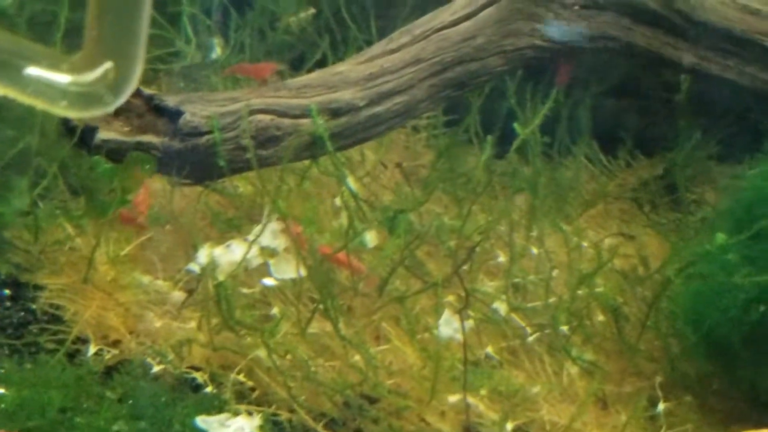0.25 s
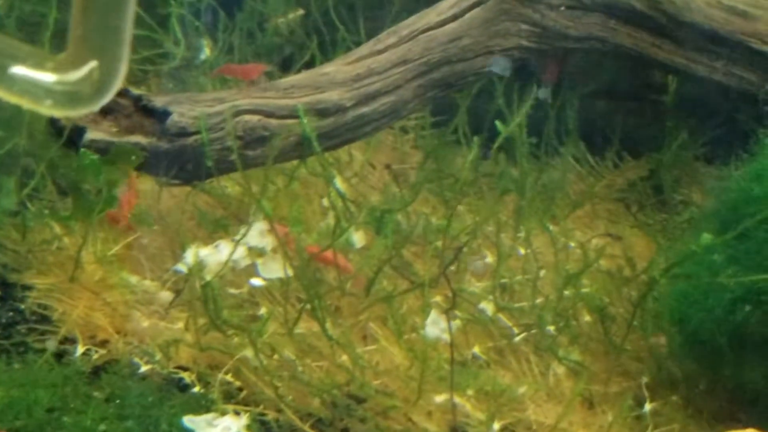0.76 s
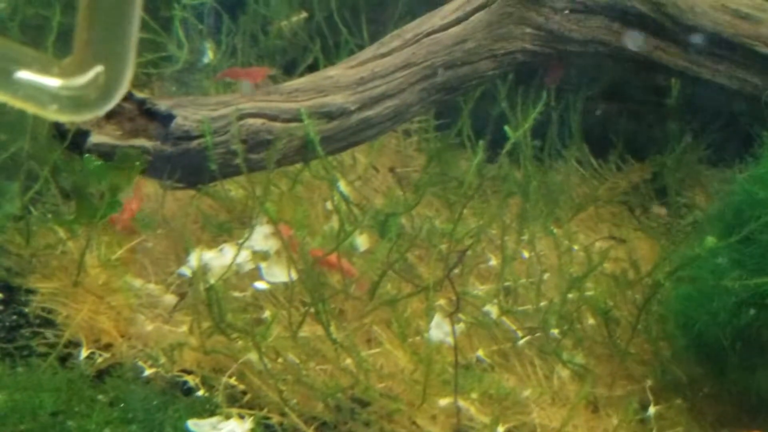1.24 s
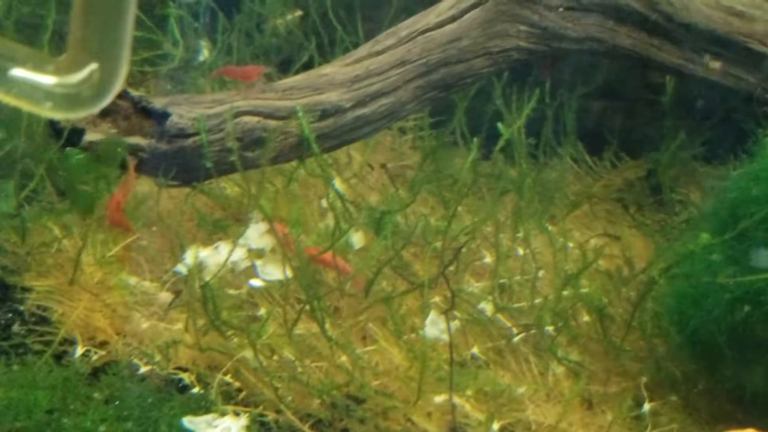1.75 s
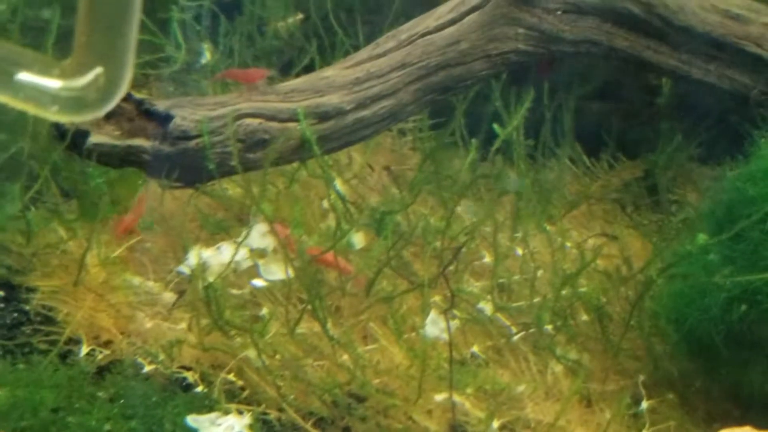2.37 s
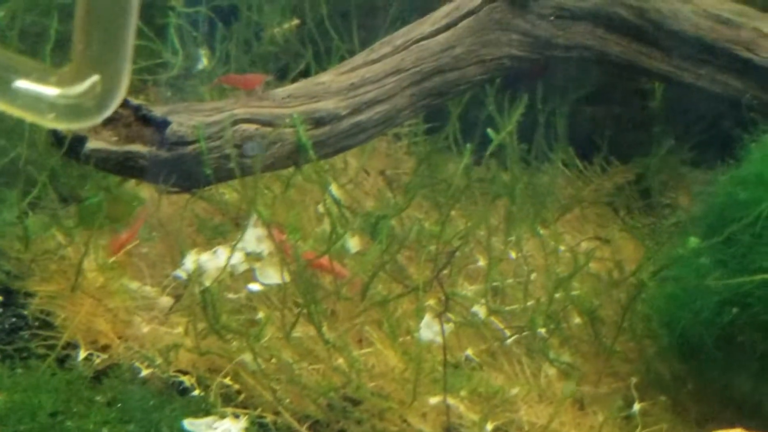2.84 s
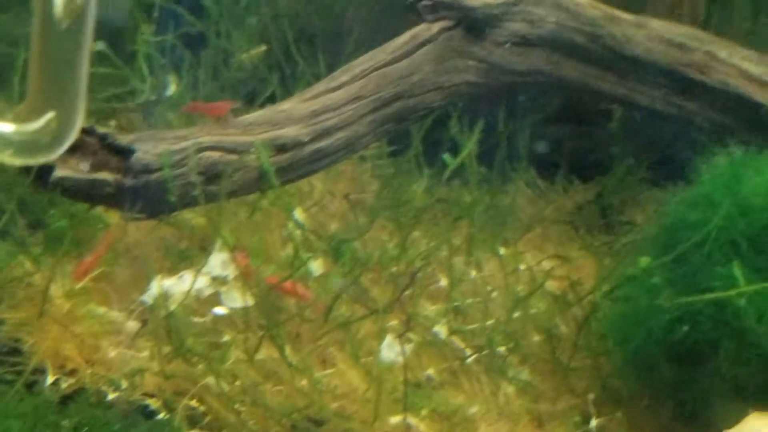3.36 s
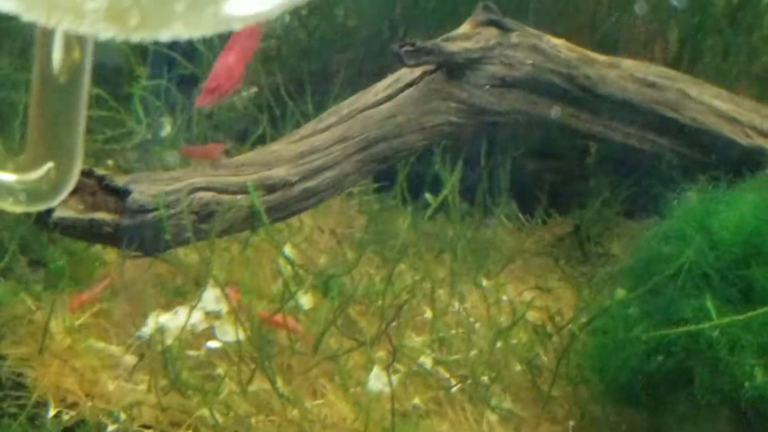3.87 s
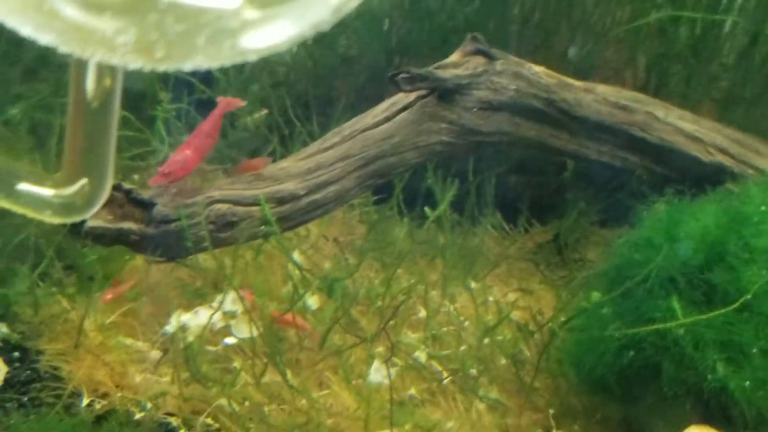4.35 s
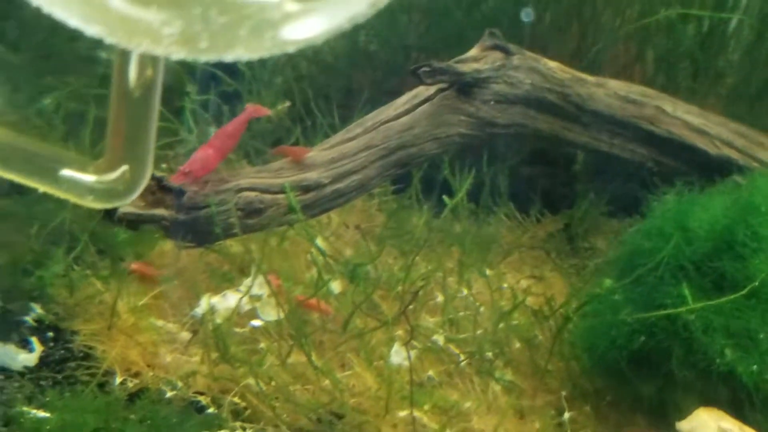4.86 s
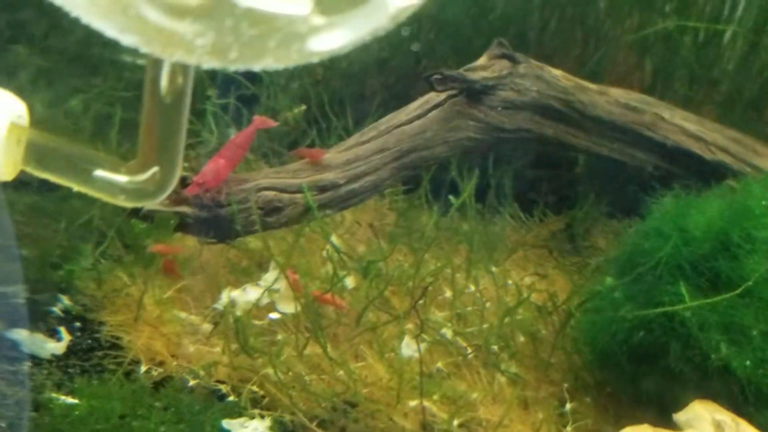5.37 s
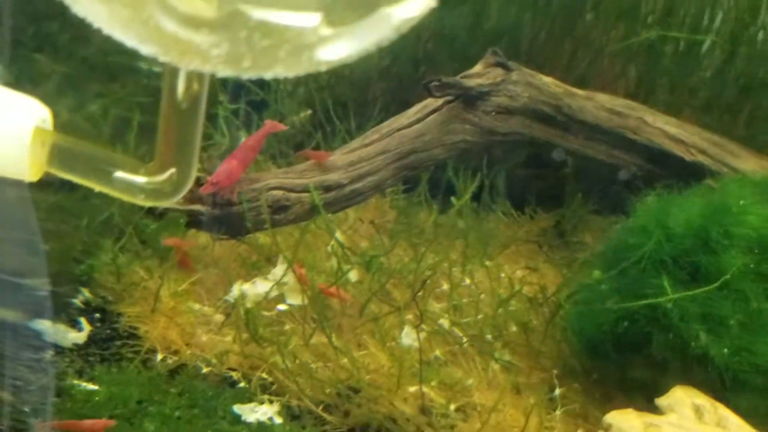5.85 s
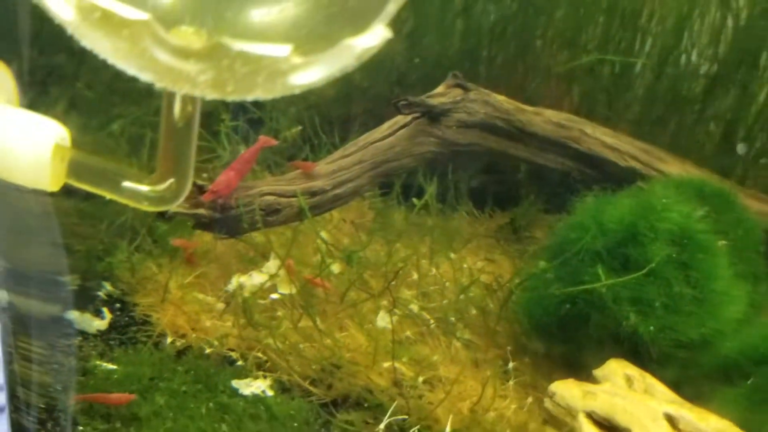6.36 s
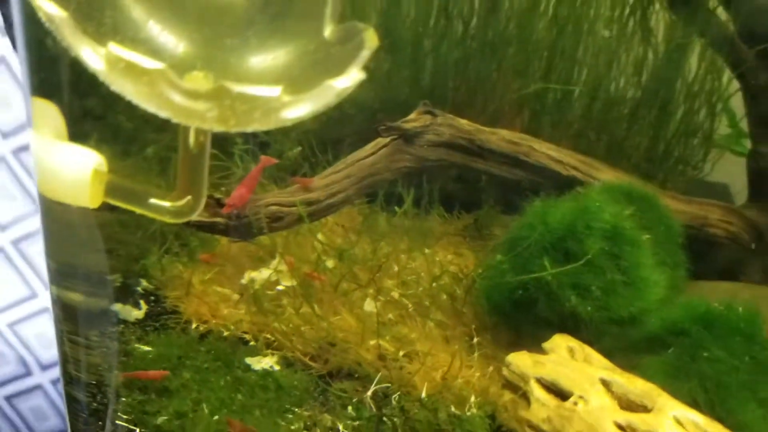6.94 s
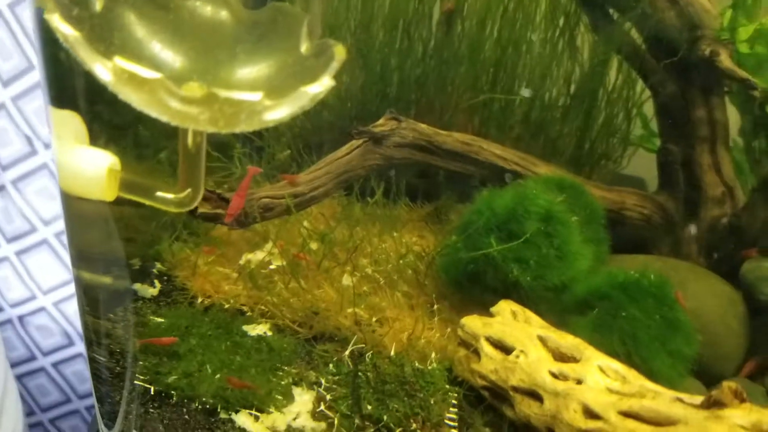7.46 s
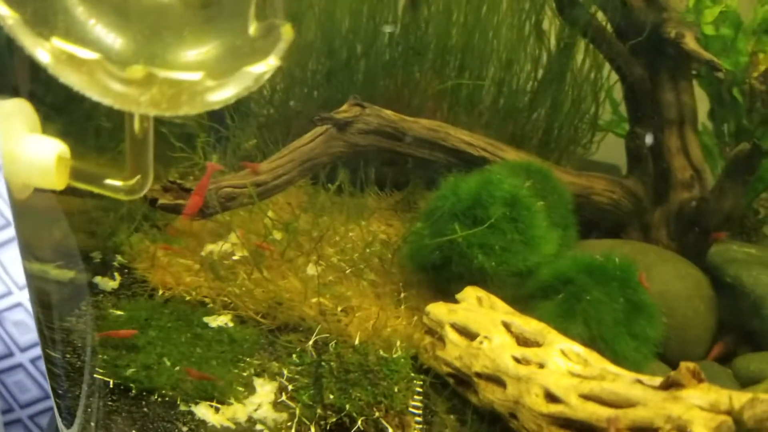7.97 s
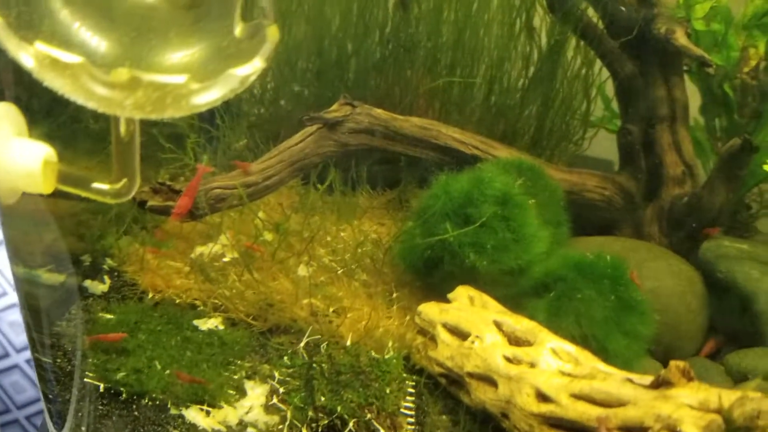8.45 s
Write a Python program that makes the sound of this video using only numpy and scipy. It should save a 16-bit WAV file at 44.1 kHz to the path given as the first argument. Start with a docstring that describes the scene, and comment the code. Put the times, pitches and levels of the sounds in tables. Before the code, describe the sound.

For about eight and a half seconds an aquarium filter pump runs without pause in a quiet room. Its low electric hum, mostly the mains tone and its first few harmonics, wavers very slightly over a soft rumble, with a faint high buzz. Water hisses through the plastic housing with a narrow, ringing colour around three to four kilohertz, stronger and brighter on the right. Tiny bubbles burst irregularly as faint, very high ticks: around 0.9, a cluster from 2.0 to 3.0, a clearer one at 4.5, several between 5.1 and 5.6. The surface fizz rises slightly at 2.2. From 3.2 to 3.9 the housing tone shifts subtly. From 3.7 to 8 the left hiss slowly weakens while the right barely changes. A lower, rounder bubble blips faintly at 7.5, and the hum continues to the end.

```python
"""An aquarium filter pump hums and faintly buzzes in a quiet room, to the right of a hand-held camera, while
water hisses through its plastic housing and bubbles burst with thin ticks. At 2.2 s the fizz steps up; from
3.2 s the housing's tone shifts as the camera turns; from 3.7 to 8 s the left side slowly falls into shade,
the right side nearly steady. The hum is a stack of mains harmonics, the buzz a comb of higher ones; the water
is shaped and resonant noise, each bubble a short ring with a noisy wash."""
import sys
import numpy as np
from scipy import signal
from scipy.fft import rfft, irfft, next_fast_len
from scipy.io import wavfile
from scipy.ndimage import uniform_filter1d, map_coordinates

SR = 44100
rng = np.random.default_rng(int(sys.argv[2]) if len(sys.argv) > 2 else 0)


def to_linear_factor(level_db):
    """Convert decibel levels (scalar or array-like) to linear amplitude factors."""
    exponent = np.asarray(level_db, float) / 20
    return 10 ** exponent


def put_to_file(sound):
    """Save the sound as 16-bit audio at rate SR, in the file named by the first command-line argument."""
    columns = np.atleast_2d(sound).T  # one column per channel
    safe = np.clip(columns, -1, 1)
    whole_steps = np.round(safe * 32767)
    wavfile.write(sys.argv[1], SR, whole_steps.astype(np.int16))


N = 384111  # length in samples

MAINS_HZ = 60.022
BODY_HZ, HISS_HZ, SPRAY_HZ, FIZZ_HZ = 600, 2000, 7500, 10200  # where each noise layer begins

# Levels of hum, buzz and noise hold 22 % of the way into the shade, where its gain is 0 dB.
# Harmonics of the coil's hum, from the mains frequency up.
# Each row: left rms level in dB, right rms level in dB, both before the waver.
HUM_HARMONICS = [(-51.9, -49.8), (-51.5, -50.5), (-68.5, -65.6), (-61.8, -62.0), (-67.9, -63.1),
                 (-61.5, -60.7), (-74.8, -85.5), (-80.7, -87.2), (-88.6, -80.4), (-92.2, -77.0),
                 (-103.2, -93.1), (-98.8, -79.6), (-96.9, -79.0), (-95.8, -85.5), (-91.0, -79.4),
                 (-95.8, -88.6), (-101.5, -87.2), (-97.2, -85.3), (-103.9, -95.7), (-86.8, -73.1),
                 (-101.8, -87.7), (-94.0, -75.2), (-103.9, -103.9), (-99.9, -103.9), (-103.9, -94.2),
                 (-100.1, -91.2), (-103.9, -88.1), (-99.3, -84.4), (-97.8, -86.9), (-91.7, -79.5)]
# Outline of the high buzz harmonics, before their uneven sizes.
# Each row: frequency in Hz, left rms level in dB, right rms level in dB.
BUZZ_OUTLINE = [(4900, -120, -110), (5300, -104, -92), (5800, -110, -99), (6200, -103, -92),
                (6700, -111, -99), (7100, -106, -94), (8000, -106, -96), (8700, -107, -98),
                (9300, -98, -100), (10000, -104, -103), (11500, -115, -106), (13300, -114, -103),
                (15700, -118, -106)]
# Low rumble of pump and room.
# Each row: frequency in Hz, left level in dB per Hz, right level in dB per Hz, left-right likeness from 0 to 1.
RUMBLE_SPECTRUM = [(20.3, -94, -88, 0), (40.2, -99, -91, 0.7), (96, -84, -86, 0.64),
                   (160, -87.5, -92.5, 0.25), (200, -88, -84.5, 0.9), (289, -86.5, -89, 0.46),
                   (333, -89.5, -97.5, 0.86), (415, -92, -96, 0.33), (552, -102.5, -100.7, 0.4),
                   (640, -106.7, -99.7, 0.7), (900.0, -105.8, -96, 0.63), (1180, -106.9, -95, 0.46),
                   (1310, -107.8, -97.5, 0.15), (2000, -107.8, -102.3, 0.35)]
# Broad hiss of the water.
# Each row: frequency in Hz, left level in dB per Hz, right level in dB per Hz, left-right likeness from 0 to 1.
HISS_SPECTRUM = [(2020, -107.8, -103.0, 0.3), (2410, -106.8, -96.5, 0.67), (2700, -105.9, -92.5, 0.1),
                 (3240, -101.2, -90.5, 0.56), (3790, -94, -90, 0.37), (4200, -101.0, -93, 0.33),
                 (4740, -103.6, -93, 0.6), (4960, -110.2, -95.5, 0.6), (5970, -111.5, -99.5, 0.4),
                 (8120, -115.5, -105.4, 0.36), (9150, -112.3, -110.1, 0.14), (10300, -113.4, -111.2, 0.03),
                 (11800, -115.0, -109.2, 0.2), (15500.0, -115.1, -108.6, 0.3)]
# Resonances of the plastic housing, with levels midway through the turn.
# Each row: centre in Hz, width at half amplitude in Hz, left peak in dB per Hz, right peak in dB per Hz,
# change over the whole turn in dB.
HOUSING_RESONANCES = [(2550, 170, -104, -91.5, -3), (2943, 120, -102, -86, 0.5),
                      (3150, 130, -99, -86, -2.5), (3485, 102, -93, -82, 0.5),
                      (3613, 250, -96, -89.5, -3.5), (3935, 200, -96.5, -86, -3),
                      (4098, 112, -89.5, -89, -2), (4940, 200, -112, -98.5, 4), (6270, 400, -114, -99, 8.5),
                      (9660, 490, -110, -122, 4), (11260, 700, -125, -110, -7),
                      (13500, 1100, -125, -114, 1)]
# Bursting bubbles, one of them large and low.
# Each row: start in seconds, level in dB before the onset and the left side's shade, pitch in Hz.
BUBBLE_BURSTS = [(0.9363, -56.5, 14000), (2.0018, -51.5, 14600), (2.136, -49.5, 13700),
                 (2.4254, -49.5, 14000), (2.6803, -51.5, 14900), (2.738, -55, 15300), (2.9911, -57, 15100),
                 (3.3124, -56.5, 15500), (3.8122, -56.5, 14000), (4.5096, -48.5, 13400),
                 (5.0893, -55.5, 14000), (5.3158, -54.5, 13300), (5.446, -57.5, 13100), (5.62, -59, 12600),
                 (6.15, -58, 13000), (7.53, -57, 1137), (7.7233, -57.5, 14200)]


def unit(x):
    """Scales a signal to rms 1."""
    return x / np.sqrt(np.mean(x ** 2) + 1e-20)


def along(points, hz):
    """Reads each column after the Hz on a log frequency axis."""
    f, *columns = np.transpose(points)
    return np.array([np.interp(np.log(hz + 1), np.log(f + 1), c) for c in columns])


def ramp(start_s, end_s):
    """Rises evenly from 0 to 1 between two times."""
    return np.interp(np.arange(N) / SR, [start_s, end_s], [0, 1])


def wobble(rate):
    """A smooth random curve with the given number of knots a second."""
    coarse = np.arange(0, N + 64, 64)
    knots = rng.standard_normal(int(N * rate / SR) + 4)
    smooth = map_coordinates(knots, [coarse * rate / SR])
    return np.interp(np.arange(N), coarse, smooth)


def patches(shape, bins, frames):
    """A random field blurred over frequency bins and time frames, at rms 1."""
    tall = uniform_filter1d(rng.standard_normal(shape), bins, 0)
    return unit(uniform_filter1d(tall, frames, 1))


def rush(gain, alike, patchy_db, slow_db):
    """Patchy stereo noise: gain(Hz) colours each side, alike(Hz) sets how much the sides share."""
    z = signal.stft(rng.standard_normal((2, N)), nperseg=512)[2]
    shape = z.shape[1:]
    field_db = patchy_db * patches(shape, 6, 14) + slow_db * patches(shape, 4, 60)
    pair = unit(signal.istft(z * to_linear_factor(field_db), nperseg=512)[1][:, :N])
    m = next_fast_len(N)
    hz = np.fft.rfftfreq(m, 1 / SR)
    right, other = rfft(pair, m)
    share = np.clip(alike(hz), 0, 1)
    left = share * right + np.sqrt(1 - share ** 2) * other
    sides = np.array([left, right])
    return irfft(sides * gain(hz) * np.sqrt(SR / 2), m)[..., :N]  # dB per Hz to full-band noise


def band(table, lo_hz, hi_hz, patchy_db, slow_db):
    """Noise following a table's spectrum between two sharp edges."""
    def gain(hz):
        return to_linear_factor(along(table, hz)[:2]) * ((hz >= lo_hz) & (hz < hi_hz))

    return rush(gain, lambda hz: along(table, hz)[2], patchy_db, slow_db)


def hum():
    """The coil's mains-locked harmonics; each wavers a little and reaches the far left port late."""
    turn = 2 * np.pi * MAINS_HZ * (np.arange(N) / SR - .0054)
    out = np.zeros((2, N))
    for k, (left_db, right_db) in enumerate(HUM_HARMONICS, 1):
        hz = k * MAINS_HZ
        lopsided = k * (k - 1) / 2  # higher harmonics come early: a quick dip, then a slow crest
        # past its 270 Hz resonance the panel swings in opposite phase
        panel_lag = np.arctan2(11 * hz, 270 ** 2 - hz ** 2)
        late = min(2 * np.pi * hz * .00022, .5)  # radians; levels off in the upper harmonics
        waver = to_linear_factor(np.minimum(0.1 * k, 2.5) * wobble(3.09))
        phase = k * turn + lopsided - panel_lag
        left = to_linear_factor(left_db) * np.cos(phase - late)
        right = to_linear_factor(right_db) * np.cos(phase)
        out += np.sqrt(2) * waver * [left, right]
    return out


def buzz():
    """A faint rattle repeating each mains cycle: a comb of uneven high harmonics, its level wavering."""
    m = next_fast_len(N)
    hz = np.arange(80, 262) * MAINS_HZ
    uneven_db = 3 * rng.standard_normal(len(hz))
    bunched = np.exp(1.2j * rng.standard_normal(len(hz)))  # loosely in step, so the rattle bunches
    comb = np.zeros((2, m // 2 + 1), complex)
    bins = np.round(hz * m / SR).astype(int)
    comb[:, bins] = to_linear_factor(along(BUZZ_OUTLINE, hz) + uneven_db) * bunched * m / np.sqrt(2)
    return irfft(comb, m)[:, :N] * to_linear_factor(1.3 * wobble(2.12))


def housing():
    """Flow noise ringing in the housing; resonances add in power and shift as the camera turns."""
    def seen(hz, way):
        power = 0
        for centre, width, left_db, right_db, change_db in HOUSING_RESONANCES:
            peak = 1 / (1 + (2 * (hz - centre) / width) ** 2)
            power = power + (to_linear_factor(np.array([[left_db], [right_db]]) + way * change_db) * peak) ** 2
        return power

    def gain(hz):
        return np.sqrt([seen(hz, -.5), seen(hz, .5)])

    before, after = rush(gain, lambda hz: .75 + 0 * hz, patchy_db=.6, slow_db=.7)
    return before + ramp(3.2, 3.9) * (after - before)


def hiss():
    """Broad noise of water passing through the housing."""
    return band(HISS_SPECTRUM, HISS_HZ, SPRAY_HZ, patchy_db=1.0, slow_db=.5)


def spray(flicker_db):
    """The hiss's lower treble, flickering alike on both sides."""
    return to_linear_factor(flicker_db) * band(HISS_SPECTRUM, SPRAY_HZ, FIZZ_HZ, patchy_db=1.2, slow_db=0.7)


def surface_fizz(flicker_db):
    """Top treble of the fizzing surface, which steps up 1 dB at 2.2 s, half that on the left."""
    stir_db = ramp(2.2, 2.35) - 1
    fizz = band(HISS_SPECTRUM, FIZZ_HZ, SR / 2, patchy_db=1.1, slow_db=0.0)
    # the left side's steadier microphone hiss halves the swell and flicker, in dB
    return fizz * to_linear_factor((stir_db + flicker_db) * np.array([[.5], [1]]))


def bubbles():
    """Each burst rings for a few dozen cycles under a noisy snap and a fizzy wash, cut at 1/8 s."""
    ring_cycles, snap_s, wash_s = 210, .01, 0.37  # each a 60 dB decay
    snap_db, usual_wash_db, left_shade_db = -13, -16, -10
    out, t = np.zeros((2, N + SR)), np.arange(SR // 8) / SR
    # fainter, fizzier bursts at random: start s, level dB, pitch Hz, wash dB
    small = rng.random((24, 4)) * [N / SR, 6, 4500, 8] + [0, -72, 10800, -9]
    listed = [(*row, usual_wash_db) for row in BUBBLE_BURSTS]
    for start_s, db, hz, wash_db in [*listed, *small]:
        onset = 1 - np.exp(-hz * t / 5)
        ring = np.sin(2 * np.pi * hz * t) * to_linear_factor(-60 * hz * t / ring_cycles) * onset
        edges = np.clip([.92 * hz, 1.09 * hz], 1, SR / 2 - 1)
        bandpass = signal.butter(2, edges, "bandpass", fs=SR, output="sos")
        noise = unit(signal.sosfilt(bandpass, rng.standard_normal((2, len(t)))))
        snap_and_wash = to_linear_factor(snap_db - 60 * t / snap_s) + to_linear_factor(wash_db - 60 * t / wash_s)
        burst = to_linear_factor(db) * (ring + snap_and_wash * noise)
        out[:, round(start_s * SR):][:, :len(t)] += burst * to_linear_factor(np.array([[left_shade_db], [0]]))
    return out[:, :N]


def rumble(lo_hz, hi_hz, patchy_db, slow_db):
    """Low noise of pump and room between two edges."""
    return band(RUMBLE_SPECTRUM, lo_hz, hi_hz, patchy_db, slow_db)


def scene():
    """Mixes pump, water, bubbles and room; the left side falls into shade, the right is nearly steady."""
    shade = ramp(3.7, 8) - .22  # 0 at the point where the tables hold

    def shaded(left_db, right_db):
        """Gain for a level change in dB on each side over the whole ramp."""
        return to_linear_factor(np.outer((left_db, right_db), shade))

    low = hum() + rumble(0, BODY_HZ, patchy_db=.8, slow_db=.8)
    body = rumble(BODY_HZ, HISS_HZ, patchy_db=1.2, slow_db=1)
    water = body + hiss() + housing() + buzz()
    flicker_db = 0.8 * wobble(5) + 0.8 * wobble(14)  # spray and fizz flicker together
    mix = low * shaded(-1.7, -0.4) + water * shaded(-4.5, -0.57)
    mix += spray(flicker_db) * shaded(-3, -0.5)
    mix += surface_fizz(flicker_db) * shaded(-2.5, .8)  # the right side's fizz rises slightly
    return mix + bubbles()


def band_limit(x):
    """A steep low-pass at the top of the band."""
    return signal.sosfilt(signal.butter(12, 15960, fs=SR, output="sos"), x)


def record(dry):
    """The camera's band limit: everything from 15760 Hz up is cut away."""
    m = next_fast_len(N)
    below_limit = np.fft.rfftfreq(m, 1 / SR) < 15760
    kept = irfft(rfft(dry, m) * below_limit, m)[:, :N]
    return band_limit(kept)


dry = scene()
out = record(dry)
put_to_file(out)
```